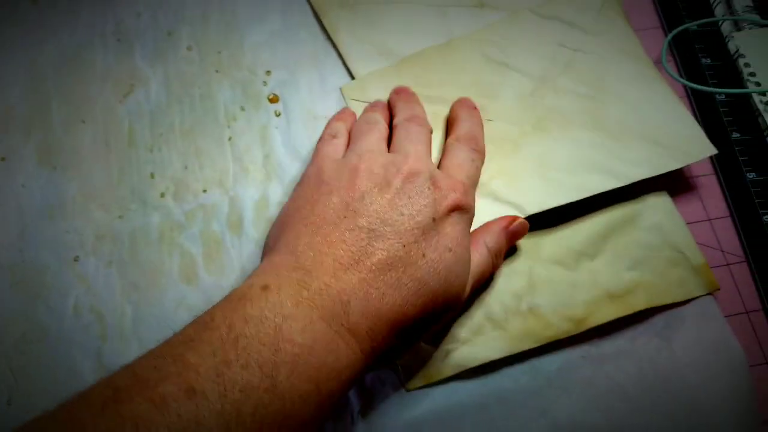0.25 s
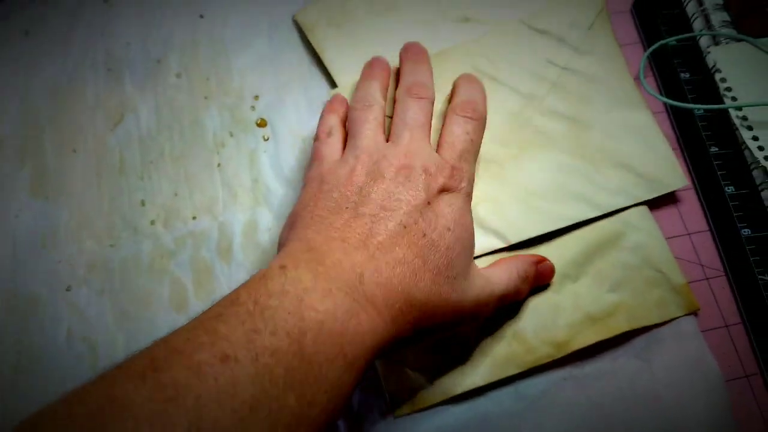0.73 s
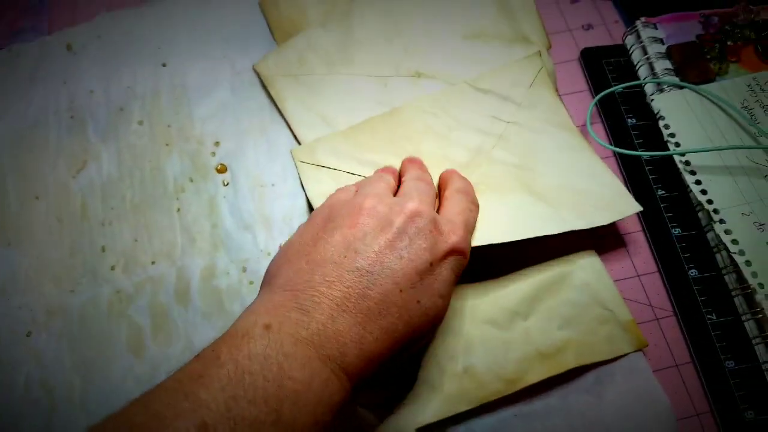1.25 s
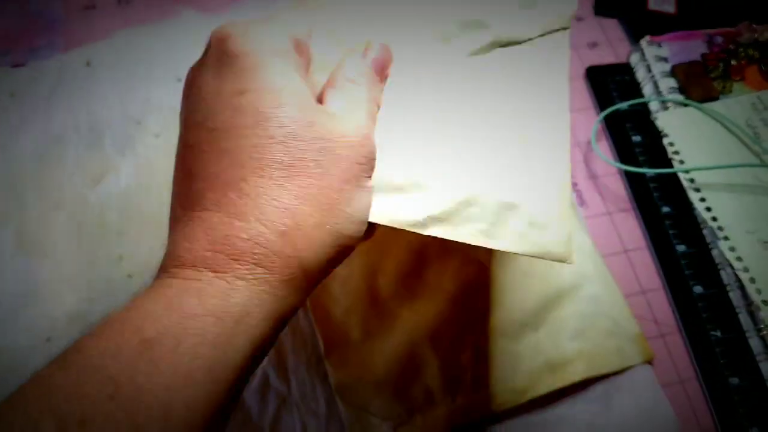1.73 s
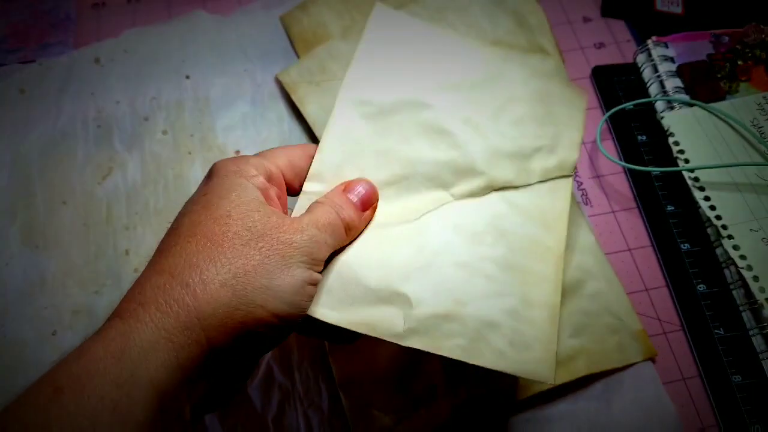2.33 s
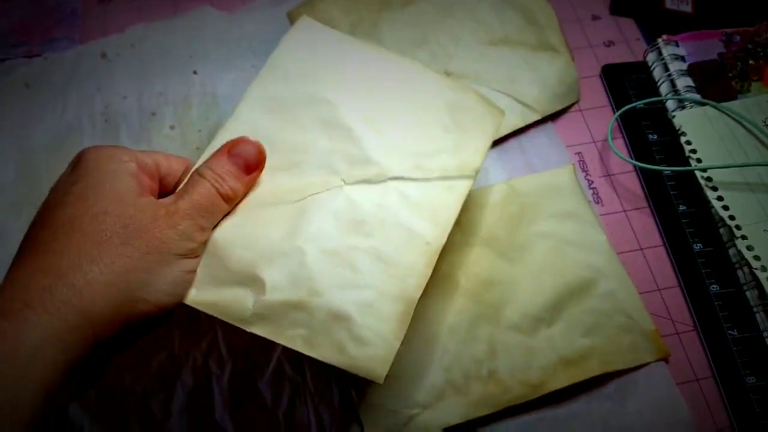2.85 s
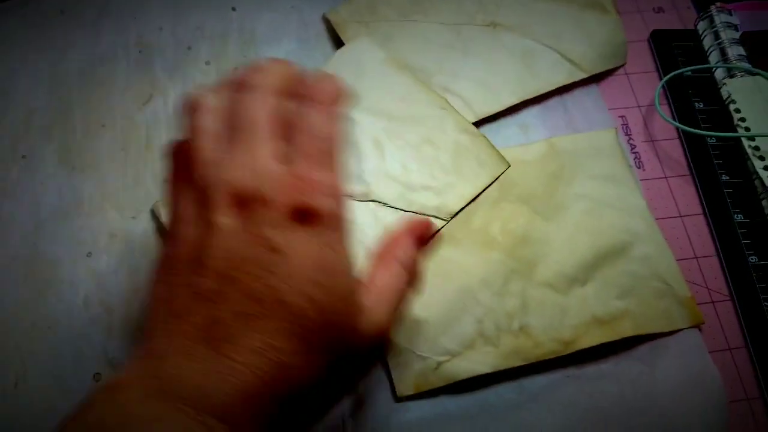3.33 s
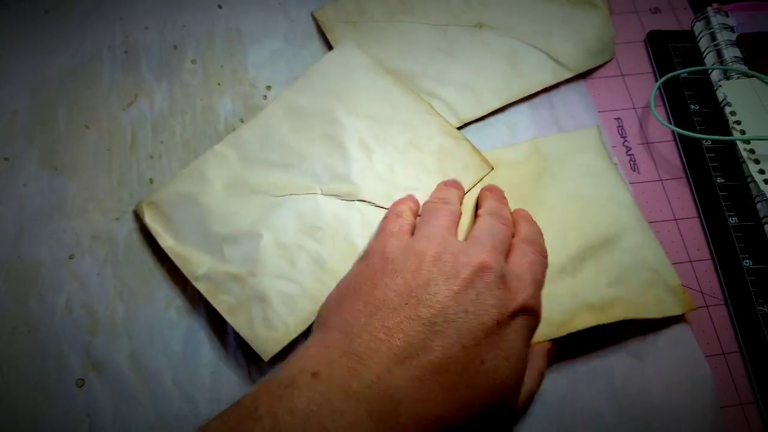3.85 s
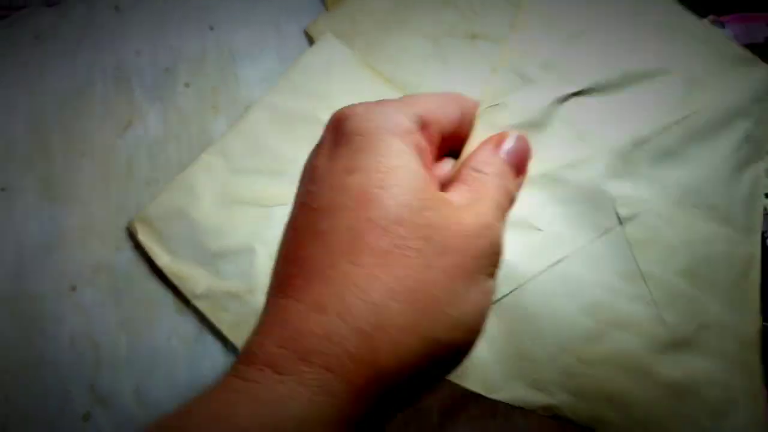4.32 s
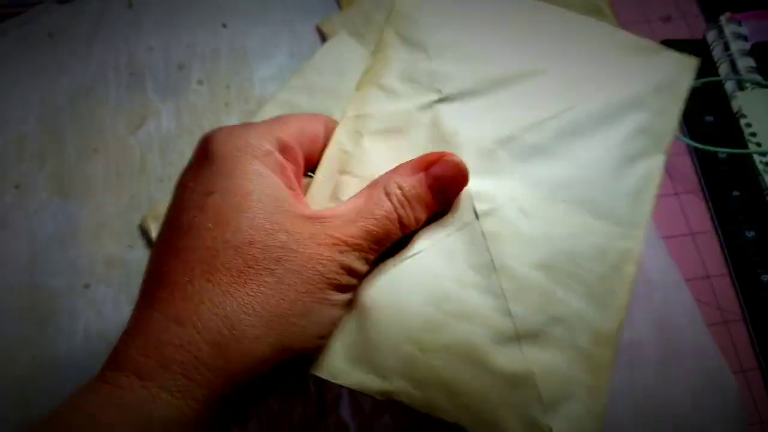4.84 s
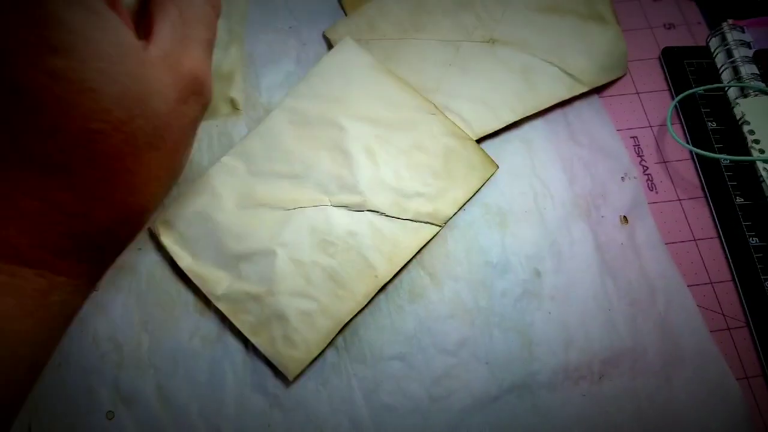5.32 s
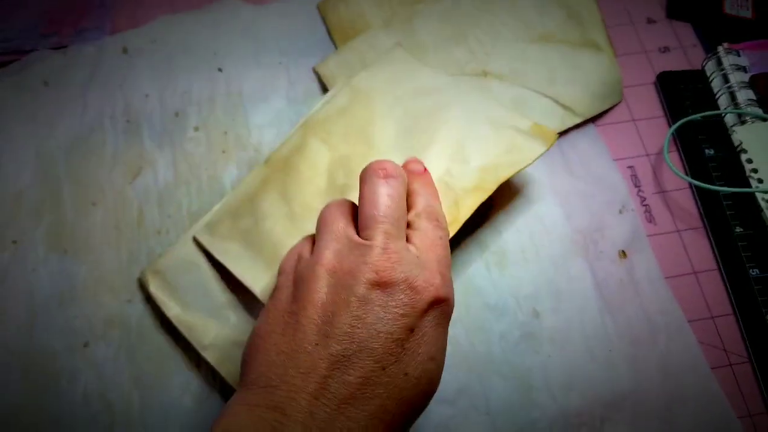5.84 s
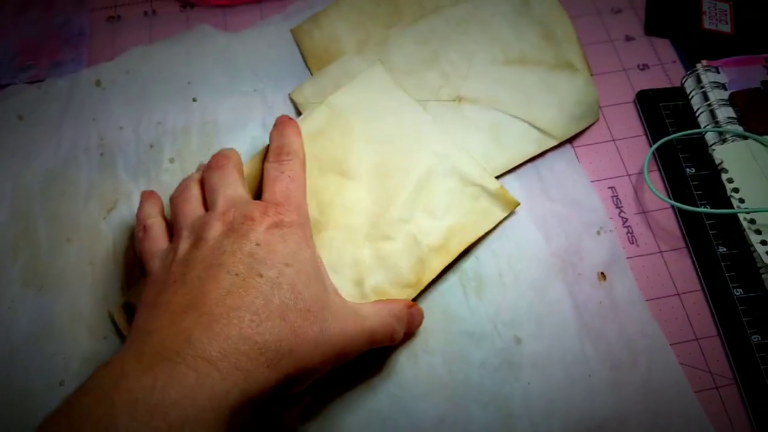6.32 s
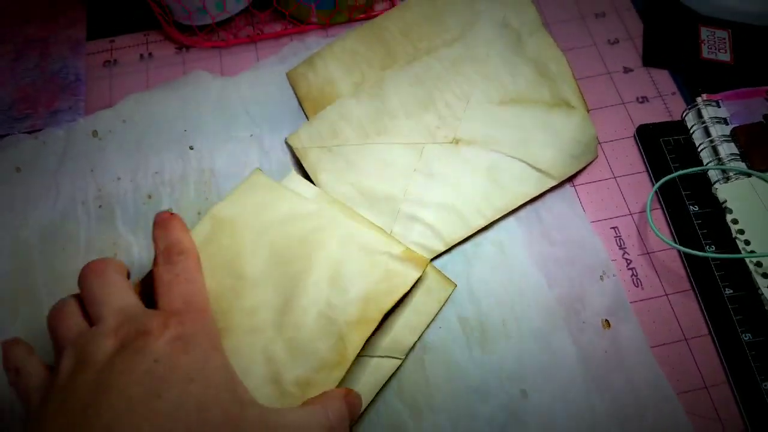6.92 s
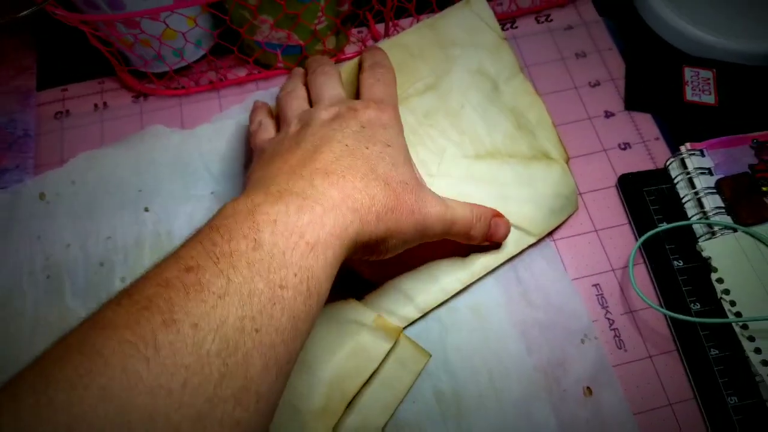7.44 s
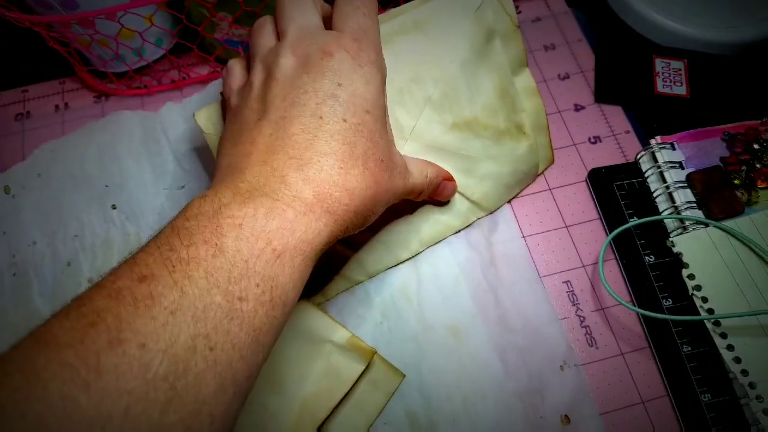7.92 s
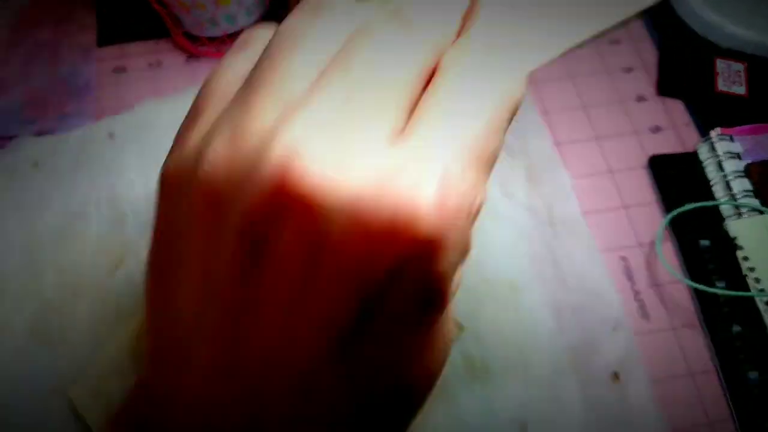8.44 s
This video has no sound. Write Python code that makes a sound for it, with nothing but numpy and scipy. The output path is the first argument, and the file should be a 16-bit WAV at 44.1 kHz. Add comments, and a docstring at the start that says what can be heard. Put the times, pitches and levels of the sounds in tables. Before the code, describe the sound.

Stiff, dried paper envelopes are handled on a worktable, close to a stereo microphone in a small room with faint air and a low hum. For the first 1.5 seconds a hand presses and rubs them in short, grainy strokes with crisp crinkles and edge scuffs. Lighter sliding follows, with sharp crease snaps around 2.2 seconds; all sound drops out briefly from 2.3 to 2.5. Soft swishes resume and build into busy rustling near 3.8 to 4.1 seconds. Loud, hollow paper cracks come at about 4.5, smaller ones around 5. A scuff and a soft, dull table bump land at 5.6; similar faint bumps occur throughout. Gentler shuffling continues from 6 to 7 seconds, then nearly stops. A stronger slide swells from 7.7, with scuffs and a loud, sharp snap at 8.3, fading soon after.

```python
"""Dried paper envelopes on a worktable

Close to a stereo microphone in a small room, a hand presses, lifts and shuffles stiff envelopes.
Paper slides over paper in short strokes of grainy hiss, creases buckle with sharp snaps that ring
the sheet, the hand bumps softly on the table and edges scuff in quick runs of slips.
Room air and a faint hum lie underneath; the sound drops out once, briefly."""
import sys
import numpy as np
from scipy import signal
from scipy.fft import rfft, irfft, next_fast_len
from scipy.io import wavfile
from scipy.ndimage import uniform_filter1d, map_coordinates

SR = 44100
rng = np.random.default_rng(int(sys.argv[2]) if len(sys.argv) > 2 else 0)


def waveform_to_disk(signal):
    """Save audio, clipped to [-1, 1], as 16-bit WAV at the path in sys.argv[1]."""
    frames = np.transpose(np.atleast_2d(signal))
    scaled = np.clip(frames, -1, 1) * 32767
    samples = np.round(scaled).astype(np.int16)
    wavfile.write(sys.argv[1], SR, samples)


N = 382788
TIME = np.arange(N) / SR

# where the paper lies in front of the microphone: time_s, left_delay_ms
PAPER_POSITION = [(0, 0.12), (.9, -0.036), (1.6, 0.038), (2.3, -0.12), (2.85, -0.16), (3.2, 0.18),
                  (4.45, 0.042), (4.75, -0.12), (5.6, -0.13), (6.3, -0.023), (7.1, -0.16), (8.3, 0.00076)]
# the sheet's thud, body, crackle and edge registers: low_hz, high_hz, ring_t60_s, stereo_correlation
# an event's level_db sets its crackle register; body_db and edge_db are relative to that
SHEET_REGISTERS = [(80, 570, 0.022, 0.4), (460, 1550, 0.061, 0.7), (1453, 5750, 0.045, 0.1),
                   (5520, 14960, 0.034, 0)]
THUD_PER_BODY = 0.56  # the thud follows the body, dB per dB


def undb(db):
    """Decibels to gain."""
    return 10 ** (np.asarray(db) / 20)


def unit(x):
    """Scale to rms 1."""
    return x / np.sqrt(np.mean(x ** 2) + 1e-20)


def decay(t, t60):
    """Envelope that falls 60 dB in t60 seconds."""
    return np.exp(-np.log(1000) * t / t60)


def colour(x, points):
    """Minimum-phase filter through (freq_hz, gain_db) points."""
    size = next_fast_len(x.shape[-1] // 2 + 1024, real=True) * 2
    hz, db = np.transpose(points)
    bins_hz = np.fft.rfftfreq(size, 1 / SR)
    gain = undb(np.interp(np.log(bins_hz + 1), np.log(hz), db))
    cepstrum = irfft(np.log(gain))
    cepstrum[1:size // 2] *= 2
    cepstrum[size // 2 + 1:] = 0
    return irfft(rfft(x, size) * np.exp(rfft(cepstrum)))[..., :x.shape[-1]]


def band(x, low_hz, high_hz, order=4):
    """Band-pass."""
    edges_hz = [low_hz, min(high_hz, SR / 2 - 1)]
    return signal.sosfilt(signal.butter(order, edges_hz, "band", fs=SR, output="sos"), x)


def resonance(x, hz, q):
    """One resonance with gain 1 at its centre."""
    return signal.lfilter(*signal.iirpeak(hz, q, fs=SR), x)


def stereo_noise(correlation, size):
    """Left and right white noise with a given correlation."""
    mid, side = rng.standard_normal((2, size))
    return np.sqrt((1 + correlation) / 2) * mid + np.sqrt((1 - correlation) / 2) * np.array([side, -side])


def left_delay_ms(time_s):
    """How much later the paper's sound reaches the left side of the microphone."""
    return np.interp(time_s, *np.transpose(PAPER_POSITION))


def place(x, pan_db, delay_ms):
    """Set a sound in the stereo image: the left side is pan_db louder and delay_ms later."""
    delayed = np.arange(x.shape[1]) - np.round(delay_ms * SR / 1000)
    left = map_coordinates(x[0], [delayed], order=0)
    left_gain, right_gain = unit(undb([pan_db / 2, -pan_db / 2]))
    return np.array([left * left_gain, x[1] * right_gain])


def add(out, start_s, x):
    """Mix x in at start_s."""
    i = int(start_s * SR)
    out[:, i:i + x.shape[1]] += x[:, :N - i]


def room_tone():
    """Still room air and a low hum."""
    # spectrum of the air: freq_hz, gain_db
    air_colour = [(20, -16.5), (35, -11.5), (55, -1), (90, -6.5), (150, -10.5), (250, -24.5), (1000, -30),
                  (5000, -34), (16000, -39.5)]
    # tones of the hum: pitch_hz, level_db
    hum_tones = [(54, -78.5), (123, -83)]
    hum = sum(undb(db) * np.sqrt(2) * np.sin(2 * np.pi * (hz * TIME + rng.random()))
              for hz, db in hum_tones)
    return undb(-72) * unit(colour(stereo_noise(0.91, N), air_colour)) + hum


def hand_motion():
    """Strokes swell, tire and die away; gives level, body, edge and pressure, led by the loudest."""
    # the hand pushes a sheet along:
    # start_s, attack_s, hold_s, level_db, body_db, edge_db, pressure (0 gliding loose, 1 pressed flat)
    strokes = [(0, 0.0033, 0.085, -49.5, -13.5, -2.5, 0.76), (.12, 0.12, 0.11, -51.5, -5.5, 2, 1),
               (.353, 0.017, 0.016, -38, -9.5, -5, 0.81), (.42, 0.048, 0.031, -46.5, -17, -8, 0.99),
               (.55, 0.043, 0.025, -47, -8, -2, 1), (.65, .04, 0.015, -34.5, -15.5, -3, 0.96),
               (.74, 0.024, 0.023, -49.5, -10, -5, 0.56), (.82, 0.054, 0.042, -47, -8.5, -4, .9),
               (.94, 0.037, 0.1, -42, -10.5, -2.5, 0.83), (1.179, .06, 0.025, -43.5, -13.5, -0.5, .8),
               (1.298, 0.046, 0.092, -44, -8, -2.5, .8), (1.52, 0.029, 0.17, -50.5, -9, 0, .35),
               (1.73, 0.081, 0.009, -44.5, -12, -1, 0.32), (1.86, 0.071, 0.053, -49.5, -12, 2.5, 0.2),
               (1.999, 0.023, 0.33, -58.5, -8, -4, .25), (2.24, 0.027, 0.027, -48.5, -7.5, 1.5, 0.17),
               (2.459, 0.012, 0.2, -50, -7, 3, 0.24), (2.81, .02, 0.023, -58.5, -8, 0.5, .1),
               (2.98, .09, 0.033, -50, -13, 7.5, 0.064), (3.179, 0.029, 0.091, -53, -14, -6.5, 0.14),
               (3.34, 0.011, .025, -49, -12, -6, 0.36), (3.668, 0.19, 0.033, -42.5, -15.5, -3, 0.34),
               (3.822, 0.054, 0.055, -41, -10.5, -6.5, .5), (3.92, 0.043, 0.093, -44.5, -8, 1, 0.67),
               (4.05, 0.033, .075, -37.5, -13.5, 0, .62), (4.26, 0.047, .03, -59, -1, -8, 0.57),
               (4.429, .03, 0.14, -49, -8.5, 0.5, .35), (4.62, 0.037, 0.017, -54.5, -2, -3, 0.4),
               (4.831, 0.095, 0.021, -50.5, -8.5, 1, 0.24), (5.052, 0.044, 0.0072, -60, -5, -4, 0.15),
               (5.24, 0.049, 0.039, -60, -18.5, -2, .07), (5.3, 0.074, 0.086, -54.5, -12, 3.5, .07),
               (5.519, 0.014, 0.093, -61.5, -1.5, -3.5, 0.23), (5.941, 0.019, .06, -60.5, -9, -4.5, 0.46),
               (6.048, 0.052, 0.044, -47, -2.5, -4, 0.66), (6.18, 0.032, .04, -58, -5, -4, 0.44),
               (6.39, 0.05, 0.022, -49.5, -14, -3, 0.65), (6.47, .04, .005, -49, -12, -7.5, 0.87),
               (6.56, 0.078, 0.08, -50.5, -17.5, -2.5, .7), (6.665, 0.046, .002, -39, -11, -6, 1),
               (6.89, 0.027, .09, -59, -11, 1, .8), (7.01, 0.033, 0.045, -54.5, -11, -1, 0.67),
               (7.35, 0.014, 0.0083, -69, -22, 7, 0.52), (7.6, 0.067, 0.027, -68.5, -4, -1.5, .5),
               (7.68, 0.078, .02, -48, -5.5, -7, .6), (7.75, .09, 0.16, -36, -8, -2, 0.64),
               (8.139, .08, .12, -43, -6.5, -1, 0.5), (8.26, 0.028, 0.0085, -31, -11, -0.5, 0.39),
               (8.48, .09, .05, -62.5, -18, -0.5, 0.27)]
    sag_db_per_s = 9.5
    power, blend = np.full(N, 1e-14), np.zeros((3, N))
    for start, attack, hold, db, body_db, edge_db, pressure in strokes:
        span = slice(int(start * SR), int(start * SR) + SR)
        t = np.maximum(TIME[span] - start, 0)
        swell = np.minimum(t / attack, 1) ** 1.13
        sag_db = sag_db_per_s * np.maximum(t - attack, 0)
        release_s = 0.074 + hold  # a long stroke takes longer to die away
        release_db = 20 * np.maximum(t - attack - hold, 0) / release_s
        stroke_power = (swell * undb(db - sag_db - release_db)) ** 2
        power[span] += stroke_power
        blend[:, span] += np.outer([body_db, edge_db, pressure], stroke_power)
    return (10 * np.log10(power), *(blend / power))


def crinkles(per_s, spread_db, ring_s):
    """Envelope of tiny creases that give way at random, most of them weak."""
    gives_way = rng.random(N) < per_s / SR
    sizes = gives_way * undb(spread_db * np.minimum(rng.exponential(size=N), 3.5))
    power = signal.lfilter([1], [1, -np.exp(-1 / (ring_s * SR))], sizes ** 2)
    return unit(np.sqrt(power))


def sliding_paper(db, body_db, edge_db, pressure):
    """Fibres catch and slip as a fine hiss; under the fingers it darkens and breaks up into crinkles."""
    # a sheet rubbed under the hand: freq_hz, gain_db
    pressed_colour = [(100, -13), (380, -8.5), (560, -16.5), (780, -2), (1080, 0.5), (1400, 2.5), (1750, 0),
                      (2300, 2.5), (4700, -1.5), (6200, -10), (7800, -9), (9200, -14.5), (15500, -13)]
    # a sheet gliding loose: freq_hz, gain_db
    loose_colour = [(100, -14), (520, -11.5), (700, -4), (1000, -2), (1600, -11.5), (2400, -4), (3800, 0),
                    (6000, -6), (7600, -6), (9200, -11), (15500, -10)]
    thud_db = -12.5 + THUD_PER_BODY * body_db
    crumple = undb(-9 * (1 - pressure) + 5.5 * pressure)  # creases against fibre hiss
    catches = crinkles(per_s=900, spread_db=3, ring_s=0.0008)
    fibres = 0.9 * (1 - pressure) + (0.1 + pressure) * catches
    shared_creases = crinkles(per_s=170, spread_db=5, ring_s=0.002)
    out = 0
    for (low_hz, high_hz, _, correlation), rel_db in zip(SHEET_REGISTERS, (thud_db, body_db, 0, edge_db)):
        register_creases = crinkles(per_s=130, spread_db=8, ring_s=0.006)
        crease_power = (shared_creases ** 2 + register_creases ** 2) / 2
        grain = np.sqrt((fibres ** 2 + crumple ** 2 * crease_power) / (1 + crumple ** 2))
        hiss = band(stereo_noise(correlation, N) * grain, low_hz, high_hz)
        # the stretch of sheet pinned under the hand has a resonance of its own
        pinned = undb(-6) * resonance(hiss, hz=1400, q=8)
        pressed = unit(colour(hiss + pinned, pressed_colour))
        loose = unit(colour(hiss, loose_colour))
        out += undb(db + rel_db) * (pressure * pressed + (1 - pressure) * loose)
    delay_ms = left_delay_ms(TIME)
    pan_db = -1.4 - 7.5 * delay_ms  # the balance shifts towards the side that hears it first
    return place(out, pan_db, delay_ms)


def jolted_sheet(events, push, ring_db, panel_db, panel_t60, facet_db, facet_q, thud_base_db):
    """Each push jolts the sheet: the panel pops low and hollow, a facet between creases rings high."""
    # a jolted sheet: freq_hz, gain_db
    paper_colour = [(100, -7), (330, -2), (540, -9), (700, -2), (1120, -0.5), (1400, -2), (2300, 6.5),
                    (4600, 5.5), (6100, 0), (7800, 2.5), (9200, -3), (15500, -3.5)]
    out, t = np.zeros((2, N)), TIME[:SR // 10]
    for start, db, body_db, edge_db, panel_hz, facet_hz, pan_db in events:
        # a larger, lower panel thuds more
        thud_db = thud_base_db + THUD_PER_BODY * body_db + 5.5 * np.log2(1000 / panel_hz)
        balance_db = thud_db, body_db, 0, edge_db
        force, sound = push(t), 0
        # front and back of the envelope swing as a close pair of modes
        swing = np.sin(2 * np.pi * panel_hz * t) + 0.16 * np.sin(2 * np.pi * 0.69 * panel_hz * t)
        panel = undb(panel_db) * unit(swing * decay(t, panel_t60))
        for (low_hz, high_hz, t60, correlation), rel_db in zip(SHEET_REGISTERS, balance_db):
            # bending waves run to and fro in the sheet and bounce off the table
            waves = stereo_noise(correlation, len(t)) * decay(t, t60) * (1 - np.exp(-t / 0.0008))
            ring = undb(ring_db) * unit(band(waves, low_hz, high_hz))
            sheet = unit(band(force, low_hz, high_hz)) + ring + band(panel, low_hz, high_hz)
            facet = undb(facet_db) * resonance(sheet, facet_hz, facet_q)
            sound += undb(db + rel_db) * unit(colour(sheet + facet, paper_colour))
        sound /= np.sqrt(10)  # the level counts the energy as if packed into 10 of the 100 ms
        add(out, start, place(sound, pan_db, left_delay_ms(start)))
    return out


def buckle(t):
    """A crease flips over in about a millisecond."""
    return stereo_noise(0.9, len(t)) * (1 - np.exp(-t / 0.0001)) * np.exp(-(t / 0.001) ** 2)


def stray_snaps(slide_db, pressure, tries_per_s=6):
    """Rows for small creases that give way at random, more under pressure, as faint as the sliding."""
    body_db, edge_db, pan_db = -10, -3, 0
    rows = []
    for when, chance in rng.random((int(tries_per_s * N / SR), 2)):
        i = int(when * N)
        if chance < pressure[i]:
            panel_hz = 1310 * 2 ** rng.normal(0, 0.073)
            facet_hz = 3300 * 2 ** rng.normal(0, 0.3)
            rows.append((TIME[i], slide_db[i] - 1.5, body_db, edge_db, panel_hz, facet_hz, pan_db))
    return rows


def crease_snaps(slide_db, pressure):
    """Creases buckle with a sharp crack that rings the sheet."""
    # a crease gives way: start_s, level_db, body_db, edge_db, panel_hz, facet_hz, left_minus_right_db
    snaps = [(0.015, -40.5, -15, -23, 1400, 2400, -3), (0.055, -38.5, -17.5, 1, 1410, 3710, 3),
             (0.257, -39.5, -8, -8, 1230, 2140, -1), (0.288, -36, -8, -32, 1420, 1700, -1.5),
             (0.354, -28.5, -4, 2.5, 1120, 7330, -1.5), (0.441, -47, -14, 2, 1310, 4030, -1),
             (0.492, -44, -19, 4, 1420, 1850, -9.5), (0.688, -30, -4.5, -6, 1300, 3470, 3.5),
             (0.705, -31, -6.5, 0, 993, 3870, -2.5), (0.897, -40.5, -6, -4.5, 1390, 2380, -4),
             (0.931, -30, -4.5, -1, 1380, 4740, -1), (1.0, -38.5, -2, -24, 1310, 2310, 3),
             (1.13, -48, 4.5, -20, 850, 1910, -0.5), (1.211, -51, -6.5, 2.5, 1410, 4340, 16),
             (1.238, -40.5, -5.5, -29, 1270, 2490, -1), (1.447, -34, -3, -4.5, 980, 5050, -2.5),
             (1.551, -59.5, 13, -6, 674, 1900, 1), (1.603, -39.5, -3.5, -12, 1230, 1990, -5),
             (1.971, -58, 9, 0.5, 800, 4920, 0.5), (2.105, -41, -9.5, 1.5, 720, 4650, 9.5),
             (2.122, -47.5, 0.5, 1.5, 744, 4380, -12), (2.135, -56, 15, -6, 720, 3500, 1.5),
             (2.146, -30.5, -9.5, -8, 563, 3680, 0), (2.229, -26.5, -16, -9.5, 1280, 3030, 2),
             (2.268, -28.5, -7, 3, 651, 7000, -0.5), (2.504, -56, 13.5, -7, 660, 4330, -1.5),
             (2.672, -36.5, 1.5, -30, 970, 1700, -1.5), (2.82, -32.5, -8.5, -11.5, 677, 2260, 6),
             (2.921, -51.5, 2.5, -6, 1220, 3570, 1), (3.26, -37.5, -10, -5, 906, 3700, -1),
             (3.348, -38, -11, -9, 1390, 3300, 3.5), (3.356, -44, -5, -12, 1300, 2000, 1),
             (3.382, -42, -12, -10, 1280, 3760, 1), (3.448, -44, -30, -4, 390, 4360, -2.5),
             (3.513, -56.5, -25, -3, 810, 3880, -1), (3.79, -53, 6, -4, 1284, 2400, 3),
             (3.844, -33, -13, 0.5, 750, 4400, -1.5), (3.875, -34, -11, 5, 780, 4130, 3),
             (4.031, -37, -10, -0.5, 1330, 4500, -1.5), (4.228, -45, -12.5, -5, 1440, 4000, -3.5),
             (4.271, -46, -13.5, 0.5, 1403, 3450, -5), (4.306, -42, -11, -4.5, 1310, 4300, -7),
             (4.319, -42, -19.5, -11, 390, 4360, -2), (4.353, -54.5, 8.5, -15, 1310, 2090, -3.5),
             (4.44, -33, -8.5, -10, 600, 3740, -7.5), (4.467, -20.5, -7, -1.5, 680, 4590, -3.5),
             (4.509, -23.5, -1, -13, 822, 3700, -2), (4.654, -51.5, 8.5, -16, 885, 2190, -1),
             (4.714, -39, 3.5, -4.5, 654, 4200, -1), (4.927, -58.5, 15, -6, 900, 1930, 1),
             (4.985, -31.5, -3, -11, 1380, 2210, 1.5), (5.061, -36, 0, -9.5, 976, 2900, -1),
             (5.09, -32.5, -5, -19, 920, 2820, -1), (5.174, -44.5, -20, -5.5, 1140, 4100, -2),
             (5.438, -56.5, -0.5, -5, 1160, 3890, -4), (5.993, -52, 0, -3, 1280, 3820, 3),
             (6.011, -61, 18, -4, 1237, 1700, -1), (6.058, -47, -6, -8, 790, 3480, 1),
             (6.1, -42, 3, -13, 1150, 1610, 3), (7.024, -41.5, -15, -8, 1030, 4870, 1.5),
             (7.042, -53.5, 7.5, -19, 1340, 1690, 4), (7.362, -56, -18.5, -4.5, 1340, 5210, 2),
             (7.689, -55, -8, 9.5, 1344, 7460, 1.5), (7.786, -46.5, 8, -12, 840, 2490, 0),
             (8.012, -32.5, -7.5, -2, 1270, 2400, -4), (8.312, -20, -18.5, -4, 800, 2340, -5.5),
             (8.363, -40, 1, -22, 1320, 1700, -1)]
    return jolted_sheet(snaps + stray_snaps(slide_db, pressure), buckle, ring_db=-2, panel_db=1.5,
                        panel_t60=0.04, facet_db=0.7, facet_q=3.8, thud_base_db=-16.5)


def table_bumps(attack_s=0.0023, decay_s=0.016, width_octaves=0.8):
    """The hand or a sheet meets the table softly: a dull, quickly damped thump with no crack."""
    # soft contacts: start_s, level_db, pitch_hz
    contacts = [(0.369, -47, 170), (.705, -56, 161), (1.655, -50.5, 320), (1.7, -58, 285),
                (3.371, -59, 128), (3.875, -53, 110), (4.569, -52, 330), (4.849, -62, 665),
                (4.946, -57, 279), (5.595, -46, 470), (5.6, -54, 170), (6.155, -56, 177), (7.125, -57, 170)]
    out, t = np.zeros((2, N)), TIME[:SR // 5]
    shape = (1 - np.exp(-t / attack_s)) * np.exp(-t / decay_s)
    half_width = 2 ** (width_octaves / 2)
    for start, db, hz in contacts:
        thump = unit(band(stereo_noise(0.96, len(t)), hz / half_width, hz * half_width, order=2))
        add(out, start, undb(db) * thump * shape / shape.max())
    return out


def slip_run(t, slips_per_s=5000):
    """Uneven slips that swell and die within some ten milliseconds."""
    slips = (rng.random(len(t)) < slips_per_s / SR) * undb(4.5 * rng.standard_normal(len(t)))
    return stereo_noise(0.13, len(t)) * slips * (1 - np.exp(-t / 0.0046)) * np.exp(-t / 0.0091)


def edge_scuffs():
    """An edge or fingertip scuffs the paper, and the quick run of slips rings the sheet."""
    # short scuffs: start_s, level_db, body_db, edge_db, panel_hz, facet_hz, left_minus_right_db
    scuffs = [(0.376, -36.5, 0.5, 2.5, 1256, 2380, -3), (0.459, -36.5, -12.5, 0, 1000, 4200, -1.5),
              (0.595, -36, -11, -6.5, 1420, 3370, -1), (0.659, -44.5, -11, 3, 1360, 4620, 7),
              (0.731, -46.5, -6, -8, 376, 3600, 0.5), (1.419, -28, -1, -6, 892, 3540, 0.5),
              (2.481, -43.5, -1.5, -2, 692, 3980, -0.5), (3.158, -45, -13, 1.5, 395, 4910, 2),
              (3.693, -45, -24, -4, 386, 3720, 1.5), (3.853, -35, -11, -1.5, 1220, 3400, 0),
              (3.884, -37, -13, 5.5, 805, 5370, -4), (4.082, -29.5, -13.5, 1, 1426, 3020, -6),
              (5.537, -38, -9, -8.5, 380, 3450, -1), (5.557, -42.5, -2.5, -8, 726, 1700, 0),
              (5.591, -37, 0.5, -8.5, 424, 3920, 0.5), (6.108, -40, -17, 0, 1130, 2910, -2),
              (6.708, -39, -6.5, -5, 1390, 1950, -3), (6.901, -58.5, -2, 8, 1344, 5660, 3),
              (7.105, -41.5, -8, -5.5, 1280, 3440, 1), (8.063, -35, -10.5, -1, 1220, 3800, -1),
              (8.111, -31.5, -7, 6, 805, 7200, -0.5), (8.385, -38, -12, -5, 1270, 3800, -7)]
    return jolted_sheet(scuffs, slip_run, ring_db=4, panel_db=-2.5, panel_t60=0.079,
                        facet_db=-4.5, facet_q=5.4, thud_base_db=-16)


def small_room(x, wet_db, t60_low, t60_high):
    """A small furnished room: a short diffuse tail, alike on both sides in the bass, duller as it fades."""
    t = TIME[:SR // 2]
    low = band(stereo_noise(1, len(t)), 220, 1400, order=2)
    mid = band(stereo_noise(0.26, len(t)), 980, 5300, order=2)
    high = band(stereo_noise(0, len(t)), 4300, SR / 2, order=2)
    tail = (low + mid) * decay(t, t60_low) + 1.9 * high * decay(t, t60_high)
    tail *= np.clip((t - 0.003) / 0.00046, 0, 1)  # reflections begin after 3 ms
    reverb = signal.fftconvolve(x, unit(tail) / np.sqrt(len(t)), axes=1)[:, :N]
    return x + undb(wet_db) * reverb


def scene():
    """Paper handled close to the microphone, with the room behind it."""
    slide_db, body_db, edge_db, pressure = hand_motion()
    background = room_tone()
    slides = sliding_paper(slide_db, body_db, edge_db, pressure)
    handling = slides + edge_scuffs() + crease_snaps(slide_db, pressure) + table_bumps()
    return small_room(handling, wet_db=-12, t60_low=0.21, t60_high=0.17) + background


def record(dry):
    """The left side is louder and a little duller; one brief dropout, rounded peaks, the top cut off."""
    # response of the left microphone: freq_hz, gain_db
    left_response = [(1000, 3.5), (4500, 4.5), (8000, 2.5), (16000, 1.5)]
    dropout_start_s, dropout_end_s = 2.312, 2.475
    ceiling, top_hz = 0.85, 15900
    live = (TIME < dropout_start_s) | (TIME > dropout_end_s)
    gate = uniform_filter1d(live.astype(float), size=130)  # 3 ms fades
    heard = np.array([colour(dry[0], left_response), dry[1]]) * gate
    rounded = ceiling * np.tanh(heard / ceiling)
    return signal.sosfilt(signal.ellip(10, 0.2, 90, top_hz, fs=SR, output="sos"), rounded)


dry = scene()
out = record(dry)
waveform_to_disk(out)
```